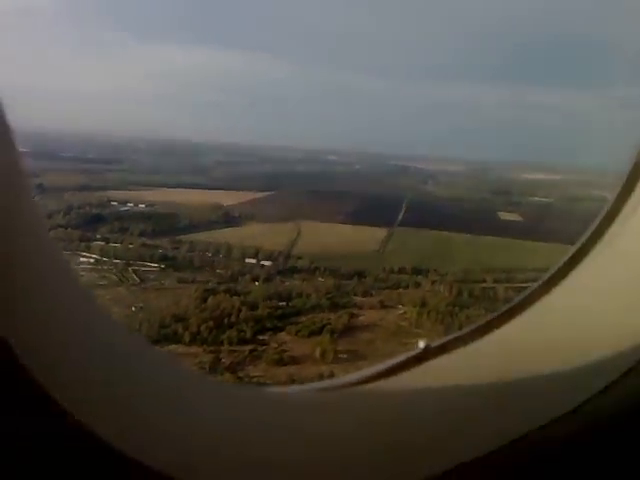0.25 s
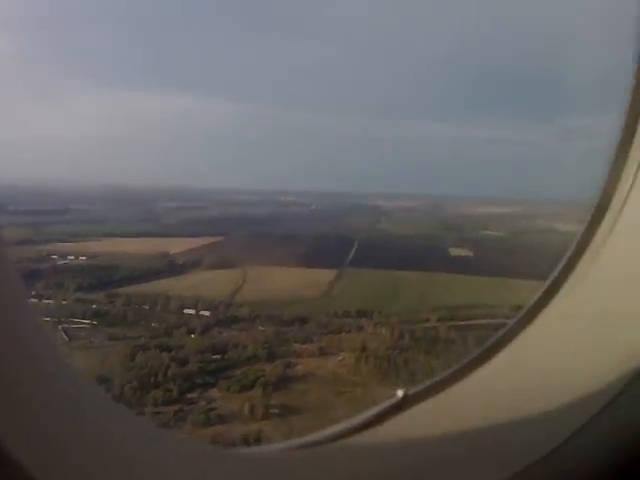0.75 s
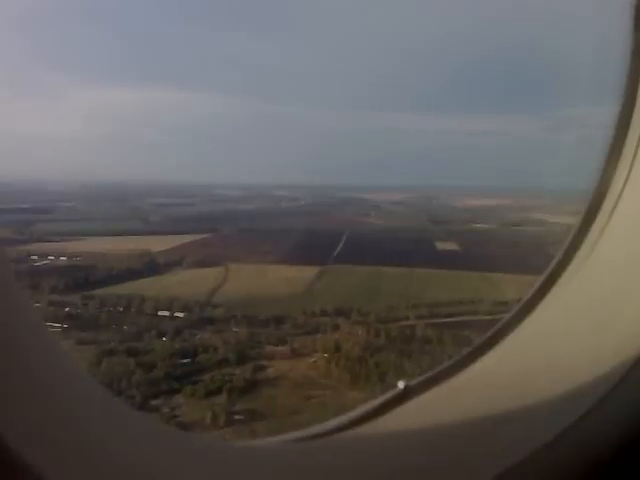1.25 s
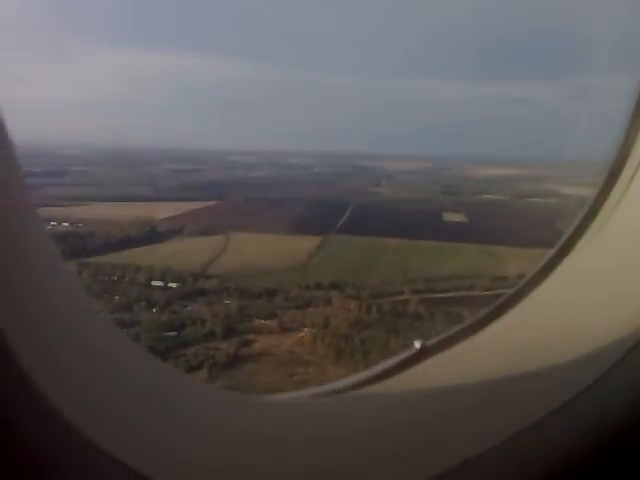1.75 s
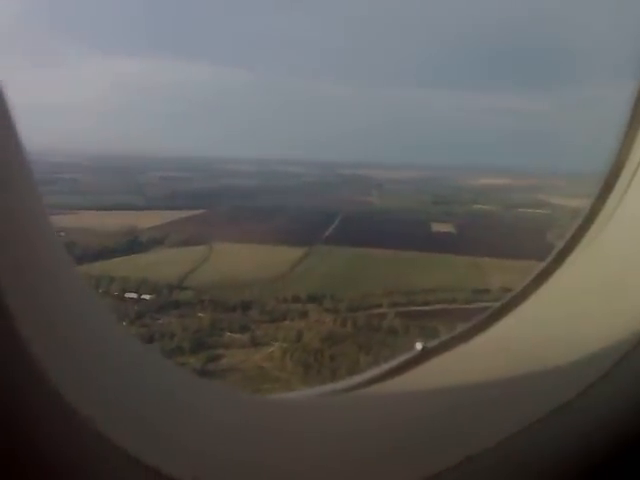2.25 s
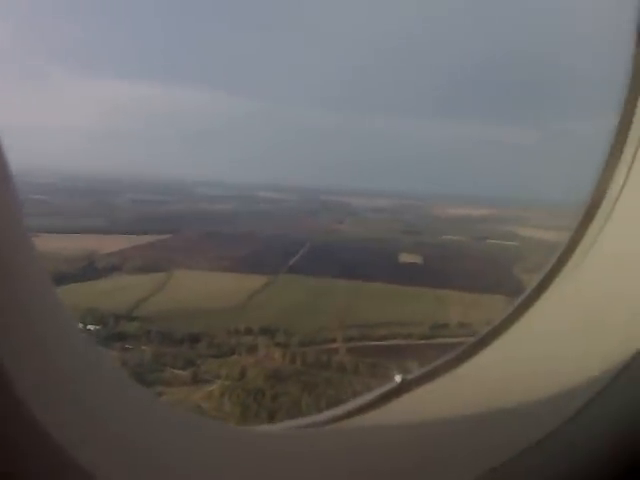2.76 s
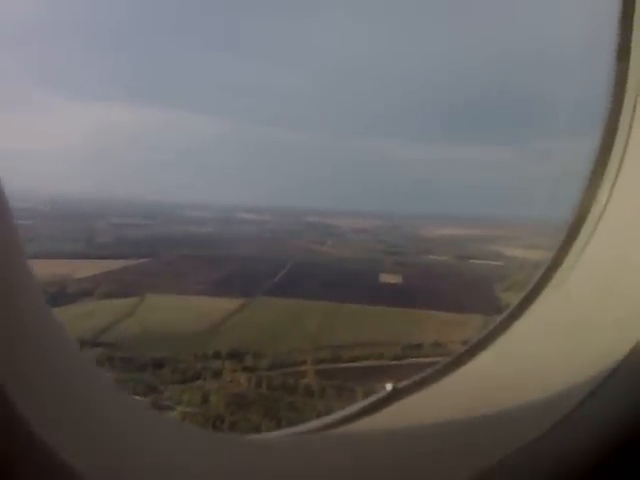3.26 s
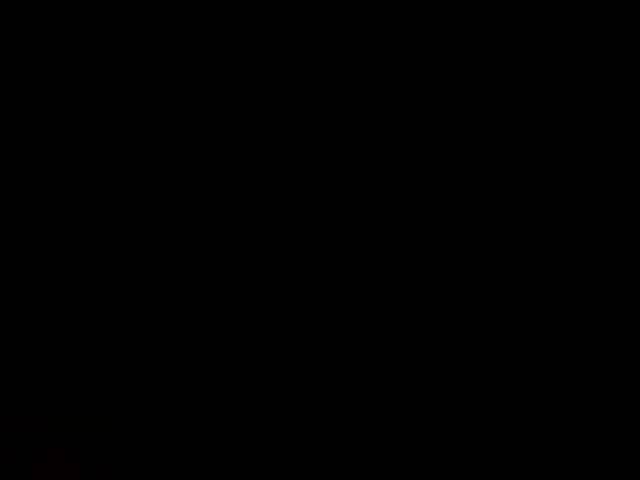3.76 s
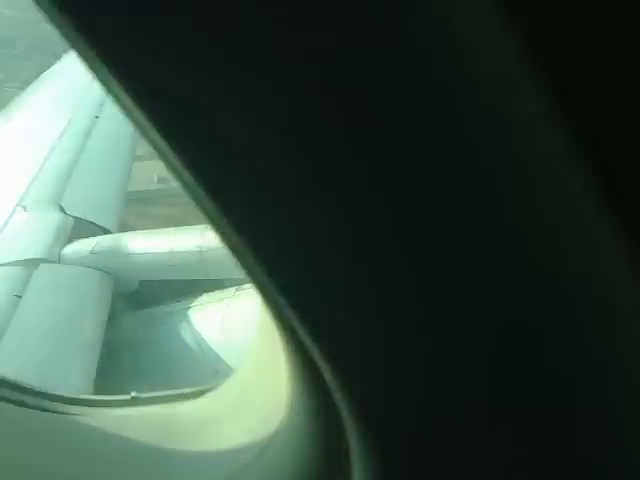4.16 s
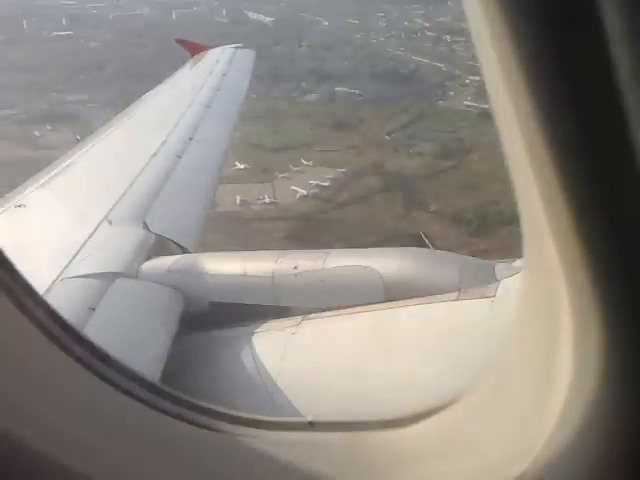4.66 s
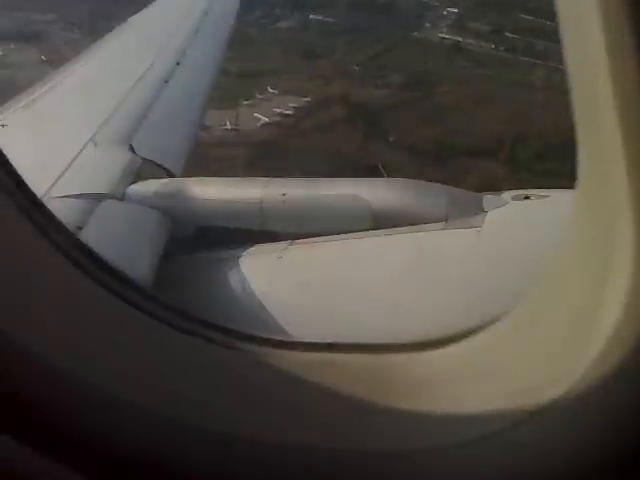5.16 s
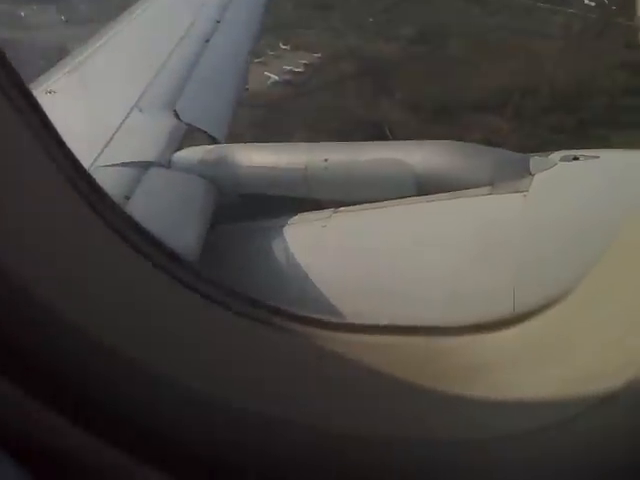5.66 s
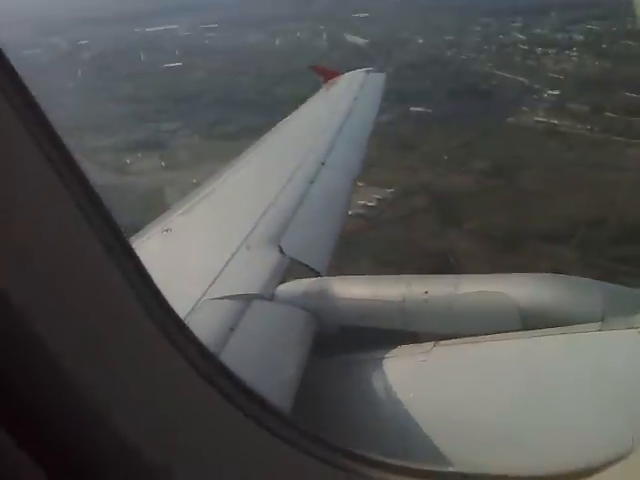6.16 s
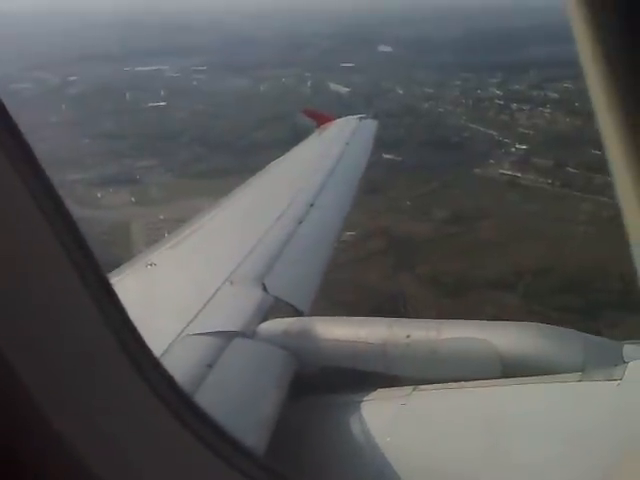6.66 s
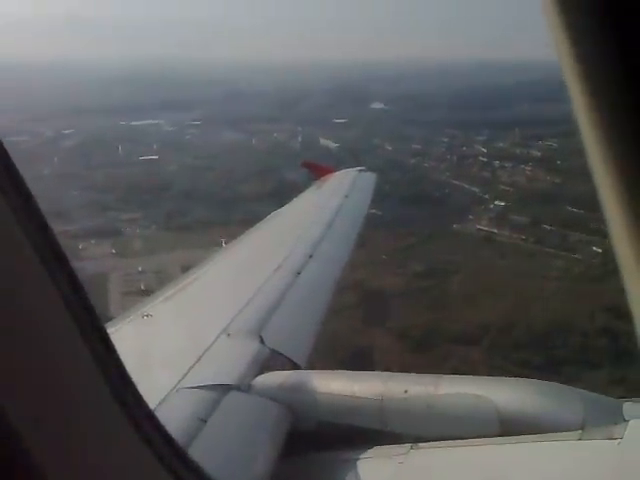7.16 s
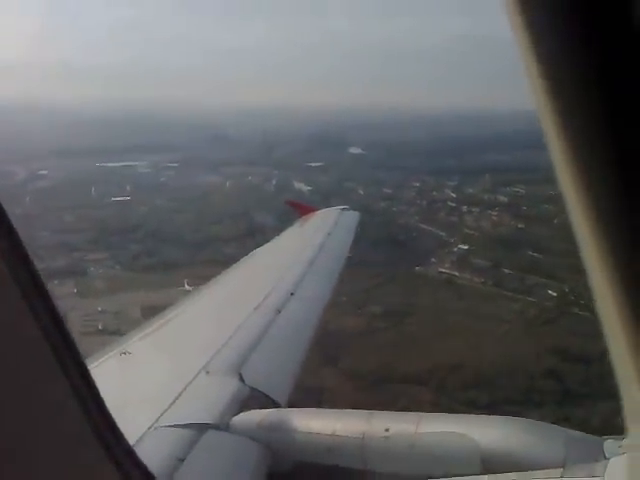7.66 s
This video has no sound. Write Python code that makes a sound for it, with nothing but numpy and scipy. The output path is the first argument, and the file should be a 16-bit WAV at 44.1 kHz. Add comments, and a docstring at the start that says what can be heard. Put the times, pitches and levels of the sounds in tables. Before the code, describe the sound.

Loud low jet drone and buzz-saw whine fill a passenger cabin, shifting in color as the microphone moves from one window to another.

```python
"""A deep rumble and a buzzing, whining comb of tones fill a climbing airliner's cabin; a hand-held microphone
moves from a window ahead of the wing to one behind it. Exhaust and airflow are shaped noise; the fan's supersonic
blade tips are sines at clean multiples of the shaft speed, which swell and fade as the microphone crosses
standing waves. Thin air noise hisses at the front window, the gap beside the seat rings with noise,
two faint hums lie underneath, and a few small plastic ticks are damped rings near the hand."""
import sys
import numpy as np
from scipy import signal
from scipy.fft import rfft, irfft
from scipy.io import wavfile
from scipy.ndimage import uniform_filter1d

SR = 44100
rng = np.random.default_rng(int(sys.argv[2]) if len(sys.argv) > 2 else 0)


def log_audio(samples):
    """Write samples as a 16-bit WAV file to the path given in sys.argv[1]."""
    # one column per channel
    frames = np.atleast_2d(samples).T
    # limit to full scale, then quantise
    limited = np.clip(frames, -1, 1)
    pcm = np.round(limited * 32767).astype(np.int16)
    wavfile.write(sys.argv[1], SR, pcm)


N = 349272
TIME = np.arange(N) / SR


def amp(db):
    """Decibels to gain."""
    return 10 ** (np.asarray(db) / 20)


def curve(rows, axis=1):
    """One column of a time table, at every sample."""
    columns = np.transpose(rows)
    return np.interp(TIME, columns[0], columns[axis])


def read(rows, hz, axis=1):
    """One column of a spectrum table, on a log-frequency axis."""
    columns = np.transpose(rows)
    return np.interp(np.log(hz + 1), np.log(columns[0] + 1), columns[axis])


def noise(rows, axis=1):
    """White noise filtered to the density in one column, in dB per Hz."""
    hz = np.fft.rfftfreq(N, 1 / SR)
    white = rng.standard_normal(N)
    shaped = irfft(rfft(white) * amp(read(rows, hz, axis=axis)), N)
    return shaped * np.sqrt(SR / 2)


def drift(rate_hz):
    """Slow random wander of rms 1, up to about the given rate."""
    hz = np.fft.rfftfreq(N, 1 / SR)
    low_pass = np.exp(-(hz / rate_hz) ** 2) * (hz > 0)
    slow = irfft(rfft(rng.standard_normal(N)) * low_pass, N)
    return slow / slow.std()


# Exhaust and airflow through the wall. Each row: frequency in Hz, density in dB per Hz at the front window,
# density in dB per Hz at the rear window.
ROAR = [(20, -72, -72), (37, -51, -50), (54.5, -37.5, -42), (68, -41.5, -42.5), (88, -43.5, -43),
        (108, -42, -40), (146, -47, -45), (184, -44, -44.5), (201, -47.5, -46), (227, -46, -44.5),
        (264, -42.5, -45), (289, -45, -49), (312, -49.5, -48), (345, -54, -49), (423, -57, -51),
        (468, -62, -57), (570, -66.5, -60.5), (736, -71, -67), (1130, -73, -70.5), (1530, -77.5, -75),
        (2360, -76.5, -81), (3320, -88.5, -88.5), (3930, -92.5, -93.5), (4860, -97.5, -96.5),
        (6100, -112, -112), (8300, -118, -116.5), (11600, -135, -135), (15500, -134, -134)]


def roar(place, gust_db=0.7, gust_hz=34.0, gust_band_hz=480, gust_octaves=0.99):
    """Broad rumble; behind the wing, unsteady exhaust fills in and roughens the low middle."""
    front = noise(ROAR, axis=1)
    rear = noise(ROAR, axis=2)
    octaves = np.log2((np.fft.rfftfreq(N, 1 / SR) + 1) / gust_band_hz)
    exhaust = irfft(rfft(rear) * np.exp(-(octaves / gust_octaves) ** 2), N)
    gusts = amp(gust_db * drift(gust_hz))
    rear = rear + exhaust * (gusts - 1)
    # crossfade at equal power
    return np.sqrt(1 - place) * front + np.sqrt(place) * rear


# Faint hums in the cabin, probably air fans. Each row: mean frequency in Hz, level in dB rms.
VENTS = [(477, -53), (529, -50.5)]


def vents(waver_hz=1.5):
    """Air fans hum as single sines, each at its own slightly unsteady speed."""
    out = np.zeros(N)
    for hz, db in VENTS:
        cycles = np.cumsum(hz + waver_hz * drift(4.0)) / SR
        out += amp(db) * np.sin(2 * np.pi * cycles)
    return np.sqrt(2) * out


# Air at the front window's frame, before the nearness. Each row: frequency in Hz, density in dB per Hz.
HISS = [(1500, -110), (3000, -87.5), (4200, -100), (5600, -102), (7000, -111), (8500, -113), (10500, -134),
        (15000, -150)]
# The microphone's nearness to that frame. Each row: time in seconds, gain in dB.
HISS_NEAR = [(0, 1), (1.6, 1.5), (2.1, 3), (2.5, -1), (2.8, -12.5), (4.5, -24), (7, -23.5), (7.92, -9)]


def hiss():
    """Thin air noise at the front window's frame, louder or fainter with the microphone's nearness."""
    return noise(HISS) * amp(curve(HISS_NEAR))


# Narrow gap between seat back and wall, before the nearness. Each row: frequency in Hz, density in dB per Hz.
GAP = [(1000, -96), (1900, -80), (2250, -81.5), (2700, -80.5), (3150, -99), (4100, -92.5), (5000, -98),
       (6000, -120), (12000, -160)]
# The microphone's nearness to the gap. Each row: time in seconds, gain in dB.
GAP_NEAR = [(0, -45), (3.4, -24), (3.7, -8), (3.92, -5.5), (4.1, -13), (4.4, -5), (4.65, -22.5),
            (7.92, -37.5)]


def seat_gap():
    """Between the rows, the gap beside the seat rings with cabin noise like a cupped hand."""
    return noise(GAP) * amp(curve(GAP_NEAR))


# Small plastic ticks near the hand, one row for each ring. Each row: start in seconds, envelope peak in dB,
# ring frequency in Hz, time to the envelope's peak in seconds.
TICKS = [(3.4648, -50, 5600, .0003), (3.4658, -51, 6900, .0004), (3.4654, -65, 9500, .0002),
         (3.623, -36, 4670, .00045), (3.6236, -45, 6500, .0003), (3.6236, -57, 8700, .0003),
         (3.6233, -64, 13500, .0002), (4.546, -61, 5900, .0008), (6.2925, -42, 4750, .00025),
         (6.2925, -47, 8100, .0003)]


def ticks():
    """Each tick is a soft contact that rings heavily damped plastic for a few cycles."""
    out = np.zeros(N)
    t = np.arange(SR // 50) / SR
    for start_s, db, ring_hz, rise in TICKS:
        envelope = (t / rise * np.exp(1 - t / rise)) ** 2
        ring = np.sin(2 * np.pi * ring_hz * t) * envelope
        start = round(start_s * SR)
        out[start:start + len(t)] += amp(db) * ring
    return out


def gap_gain(hz, near_db, boost_db=6.0, ring_hz=2750, octaves=0.25):
    """The gap beside the seat also lifts the fan tones that fall in its resonance."""
    resonance = np.exp(-(np.log2(hz / ring_hz) / octaves) ** 2)
    return amp(boost_db * amp(near_db) * resonance)


def standing_wave(hz, path, place, direct, count=8):
    """A direct wave plus reflections gives one tone's complex gain, of mean power 1 at each window."""
    wavelength = 343 / hz  # metres, from the speed of sound in m/s
    slant, start = rng.uniform(-1, 1, (2, count, 1))
    waves = np.exp(2j * np.pi * (slant * path / wavelength + start))
    reflected = waves.sum(0) / np.sqrt(count)
    field = direct + reflected
    power = abs(field) ** 2
    front = np.average(power, weights=1 - place)
    rear = np.average(power, weights=place)
    return field / np.sqrt(front + place * (rear - front))


# Fan shaft speed, creeping up. Each row: time in seconds, turns a second in Hz.
SHAFT = [(0, 75.39), (1, 75.42), (2, 75.455), (3, 75.48), (4.5, 75.5), (6, 75.555), (7, 75.6),
         (7.92, 75.67)]
# How fast the hand carries the microphone. Each row: time in seconds, speed in metres a second.
HAND = [(0, 0.041), (2.7, 0.046), (3.1, 0.26), (4.5, .3), (5.5, .14), (7.92, 0.099)]
# Buzz-saw tones, before standing waves, seat shade and gap lift. Each row: shaft order,
# level in dB rms at the front window, level in dB rms at the rear window.
ORDERS = [(1, -30.8, -31), (3, -44, -37), (5, -49, -50), (6, -48, -50), (7, -52, -48), (8, -51, -49),
          (9, -57, -56), (12, -57, -53), (13, -59, -50.5), (15, -47, -52), (20, -51, -59), (21, -53, -61),
          (22, -51, -54), (23, -55, -63), (25, -64, -57), (28, -63, -63), (29, -60, -71), (30, -65, -68),
          (31, -67, -68), (33, -65, -71), (34, -61, -70), (35, -66, -69), (37, -64, -69), (39, -61, -73),
          (40, -71, -69), (41, -73, -76), (42, -65, -73), (43, -66, -72), (44, -75, -77), (45, -65, -76),
          (46, -74, -74), (47, -77, -84), (48, -70, -77), (49, -77, -82), (50, -73, -87), (57, -78, -74.5)]
# The comb's faint top, before those effects and a random offset for each tone. Each row: frequency in Hz,
# level in dB rms at the front window, level in dB rms at the rear window.
FIZZ = [(3800, -76, -81), (4800, -77.5, -81), (5700, -85, -87), (6450, -96.5, -101), (7300, -103, -106),
        (8200, -103, -107), (9200, -108, -114)]
# Fifteen fan tones along the microphone's path, through their loud and quiet spots.
# Each row of these tables: time in seconds, level in dB rms before the flutter.
DRONE = [(0, -27), (3.5, -29), (4.1, -25), (4.6, -27.3), (5.2, -29), (6.2, -25), (6.9, -25.8), (7.9, -25.5)]
HUM = [(0.0, -31), (0.84, -24), (1.92, -26), (4.14, -25), (5.16, -36.5), (5.64, -43.5), (6.42, -29.5),
       (7.2, -33.5), (7.55, -34), (7.9, -36)]
LOW_BUZZ = [(0, -47.5), (1.4, -55), (2.2, -47), (2.7, -46), (3.3, -65.5), (4.1, -52.5), (4.5, -44.5),
            (7.92, -45)]
HIGH_BUZZ = [(0, -52), (2.5, -49.5), (3.3, -53.5), (3.9, -50), (4.5, -64), (4.75, -59), (5, -46),
             (5.9, -47.5), (6.3, -54), (7.92, -60.5)]
UNDER_WHINE = [(0, -52), (2.9, -49), (3.2, -47), (3.8, -46.7), (4.1, -56), (4.5, -49.5), (5.1, -59),
               (7.2, -49.5), (7.9, -48.5)]
# whine at 16 times the shaft speed, with a quiet spot near 3.9 s
ORDER_16_WHINE = [(0, -42.5), (.8, -47), (1.5, -44.5), (3.0, -44.5), (3.6, -50.5), (3.9, -60.5),
                  (4.3, -46.5), (5.6, -47), (6.2, -46.5), (7.9, -42.5)]
FRONT_WHINE = [(0, -45.5), (1, -47), (3.6, -45), (4.15, -48), (4.5, -49), (5.2, -53), (5.7, -51),
               (6.2, -50), (6.7, -49.5), (7.9, -58.5)]
LOW_WHINE = [(0.0, -64), (0.72, -47.5), (1.92, -50.5), (2.22, -60.5), (3.78, -51), (3.96, -45),
             (4.5, -72.5), (4.68, -50), (5.16, -63), (5.34, -45.5), (5.88, -48), (6.3, -42.5), (6.66, -50),
             (7.02, -43.5), (7.62, -42.5), (7.9, -45)]
MAIN_WHINE = [(0.0, -44), (1.08, -67), (1.44, -46), (2.94, -46), (3.18, -62.5), (3.48, -46.5),
              (3.96, -63.5), (4.44, -42), (4.8, -52), (5.04, -44), (5.46, -53), (6.0, -44.5), (6.24, -66.5),
              (6.42, -44.5), (7.32, -47.5), (7.9, -43.1)]
THIN_WHINE = [(0, -52), (.5, -53), (.9, -67.5), (1.3, -66), (2.6, -49), (3.15, -63), (3.5, -49), (4.3, -58),
              (5.15, -50.5), (6.1, -61), (6.6, -54.5), (7.9, -52)]
BRIGHT_WHINE = [(0, -65), (.3, -67), (.6, -52.5), (1.5, -51), (2.2, -58), (2.9, -54), (3.6, -63), (4, -52),
                (4.3, -67.5), (7.9, -71)]
MID_WHINE = [(0.0, -46.5), (0.66, -51.5), (1.08, -48), (1.44, -52.5), (1.62, -49), (2.7, -45.5),
             (3.06, -54), (3.24, -44), (3.42, -56), (3.84, -46), (4.86, -66.5), (6.66, -61.5), (7.9, -60)]
UPPER_WHINE = [(0, -59), (.3, -51), (1.3, -62.5), (1.9, -53.5), (2.8, -59), (3.7, -54), (4.1, -63.5),
               (5.2, -61.5), (6.8, -65), (7.1, -56.5), (7.9, -59)]
HIGH_WHINE = [(0.0, -54), (0.24, -51.5), (0.66, -57), (1.86, -51.5), (2.7, -64), (2.88, -53), (3.66, -60),
              (3.92, -46.5), (4.06, -65), (4.2, -51), (4.62, -66), (7.9, -61)]
TOP_WHINE = [(0.0, -55.5), (0.54, -61), (0.84, -52), (1.26, -52), (1.56, -57.5), (2.82, -54), (3.06, -68),
             (3.48, -58), (3.78, -68), (7.9, -72.5)]
# Which tone those tables describe. Each entry: shaft order, then its level table.
PATH_TONES = {2: DRONE, 4: HUM, 10: LOW_BUZZ, 11: HIGH_BUZZ, 14: UNDER_WHINE, 16: ORDER_16_WHINE,
              17: FRONT_WHINE, 18: LOW_WHINE, 19: MAIN_WHINE, 24: THIN_WHINE, 26: BRIGHT_WHINE,
              27: MID_WHINE, 32: UPPER_WHINE, 36: HIGH_WHINE, 38: TOP_WHINE}


def fan(place, flutter=0.078, wander_hz=0.01, direct=1.1, diffuse_hz=1800, count=120, size=128,
        shade_db=-1, shade_hz=800):
    """Each fan blade drags a slightly different shock, so every multiple of the shaft speed sounds."""
    turns = np.cumsum(curve(SHAFT) + wander_hz * drift(3.0)) / SR
    turn = np.exp(2j * np.pi * turns)
    # gains are computed once every `size` samples
    slow_t, place = TIME[::size], place[::size]
    path = np.cumsum(curve(HAND))[::size] / SR  # metres
    behind_seat = np.sin(np.pi * place)  # most halfway between the windows
    near_gap_db = curve(GAP_NEAR)[::size]
    listed = {round(order): levels for order, *levels in ORDERS}
    out, wave = np.zeros(N), np.ones(N, complex)
    for order in range(1, count + 1):
        wave = wave * turn
        hz = order * SHAFT[0][1]
        if order in PATH_TONES:
            level_t, level_db = np.transpose(PATH_TONES[order])
            gain = np.interp(slow_t, level_t, amp(level_db))
        else:
            if order in listed:
                front_db, rear_db = listed[order]
            else:
                front_db, rear_db = [read(FIZZ, hz, axis=side) + 1.5 * rng.standard_normal()
                                     for side in (1, 2)]
            db = front_db + place * (rear_db - front_db)
            # the seat back shades the higher tones
            db = db + shade_db * behind_seat * (hz > shade_hz)
            # long waves hardly change over a hand's travel; short ones swell and fade
            direct_wave = direct * (1 + (diffuse_hz / hz) ** 2)
            gain = amp(db) * standing_wave(hz, path, place, direct_wave) * gap_gain(hz, near_gap_db)
        # turbulence at the intake shakes each tone a little, in level and phase
        shake = uniform_filter1d(rng.standard_normal((2, len(slow_t))), size=24, axis=1)
        gain = gain * (1 + flutter * (shake[0] + 1j * shake[1]) / shake.std())
        # the wall passes each tone with its own phase
        gain = gain * np.exp(2j * np.pi * rng.random())
        out += (np.interp(TIME, slow_t, gain) * wave).real
    return np.sqrt(2) * out


# Where the microphone is. Each row: time in seconds, place from 0 at the front window to 1 at the rear window.
PLACE = [(0, 0), (3.6, 0.02), (4.1, 0.069), (4.5, 0.72), (5.0, 1), (7.92, 0.96)]


def scene():
    """Roar, hums, local air noise, ticks and fan tones add up at the moving microphone."""
    place = np.clip(curve(PLACE), 0, 1)
    background = roar(place) + vents()
    nearby = hiss() + seat_gap() + ticks()
    return (background + nearby + fan(place))[None]


def record(dry, opening_s=0.004, edge_hz=15700):
    """The recorder opens softly and a low-pass filter limits the band."""
    opening = np.sin(np.pi / 2 * np.minimum(TIME / opening_s, 1)) ** 2
    low_pass = signal.firwin(511, edge_hz, window=("kaiser", 9), fs=SR)
    return signal.oaconvolve(dry * opening, low_pass[None], "same")


dry = scene()
out = record(dry)
log_audio(out)
```